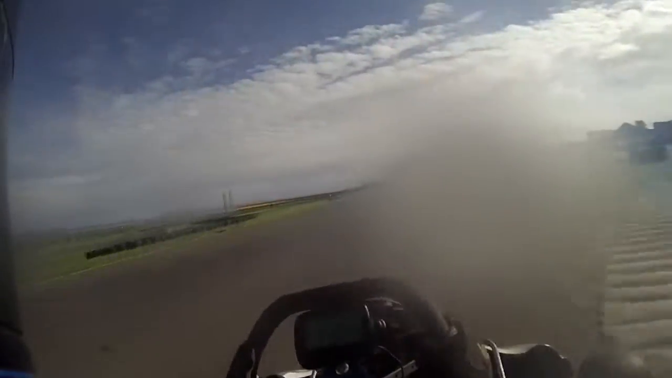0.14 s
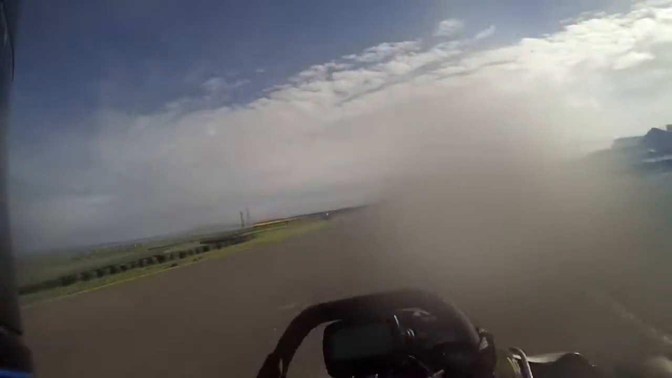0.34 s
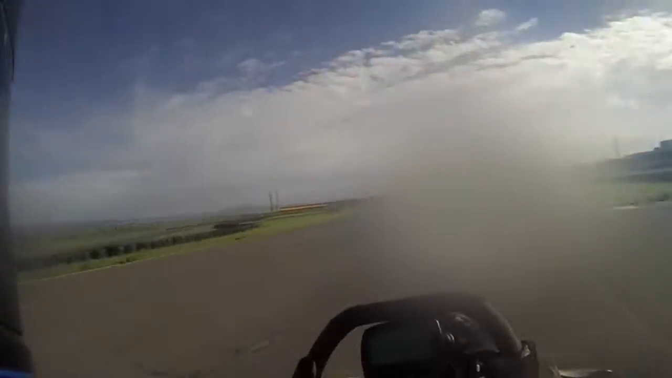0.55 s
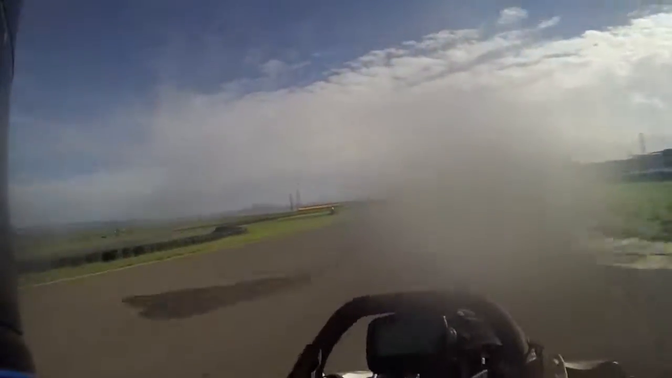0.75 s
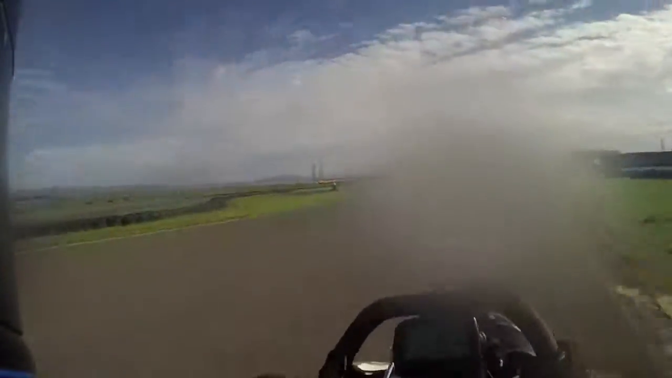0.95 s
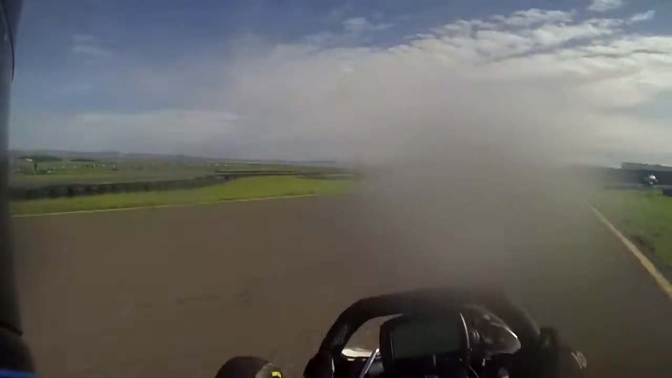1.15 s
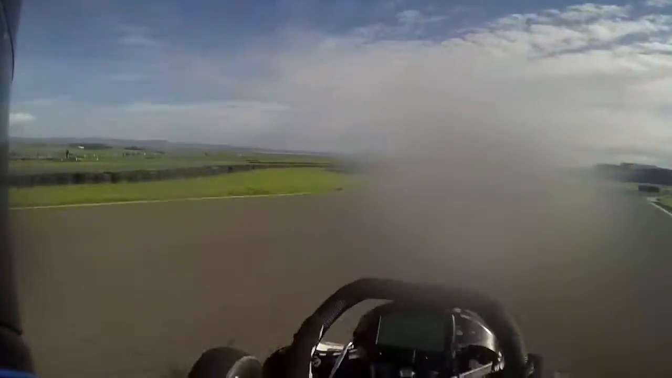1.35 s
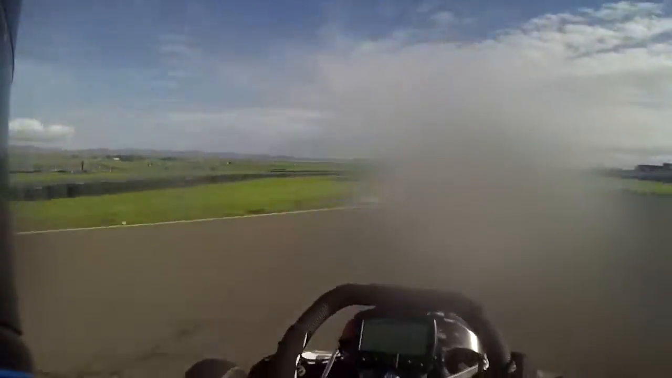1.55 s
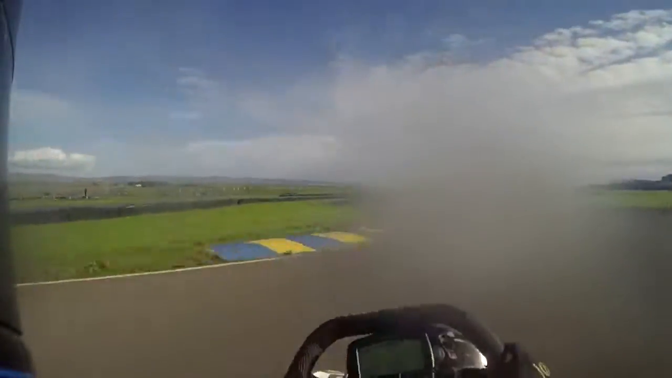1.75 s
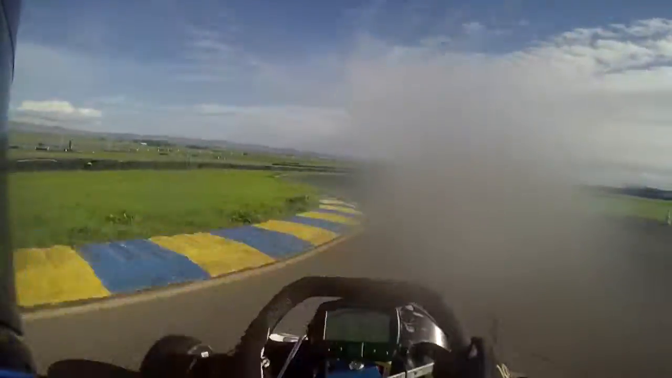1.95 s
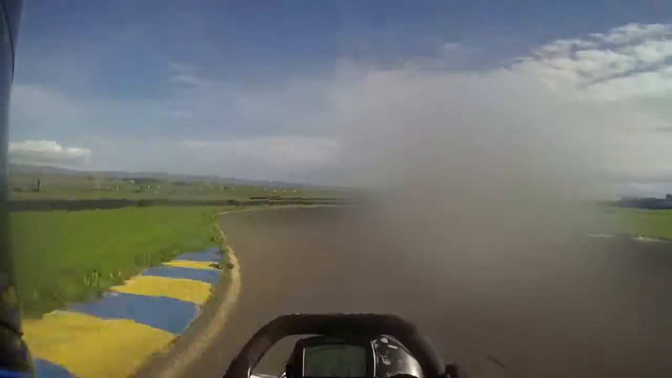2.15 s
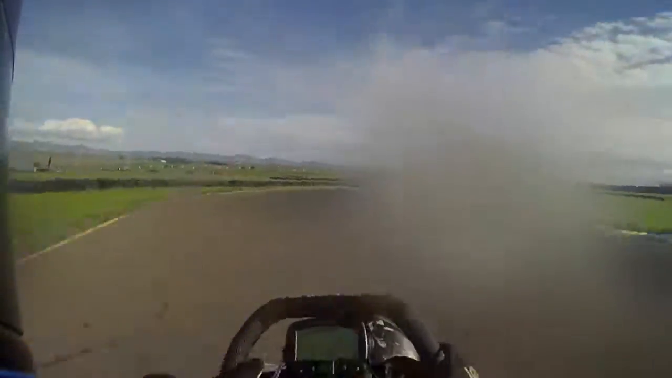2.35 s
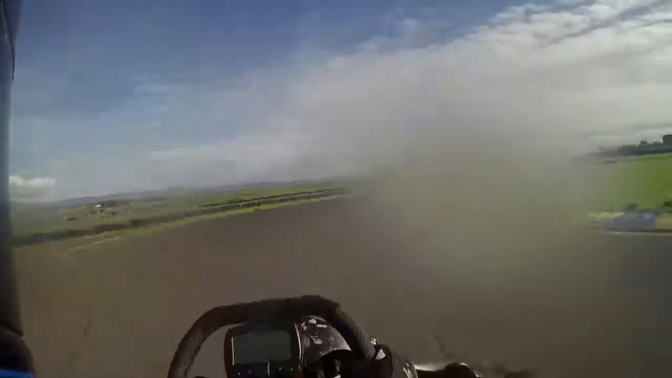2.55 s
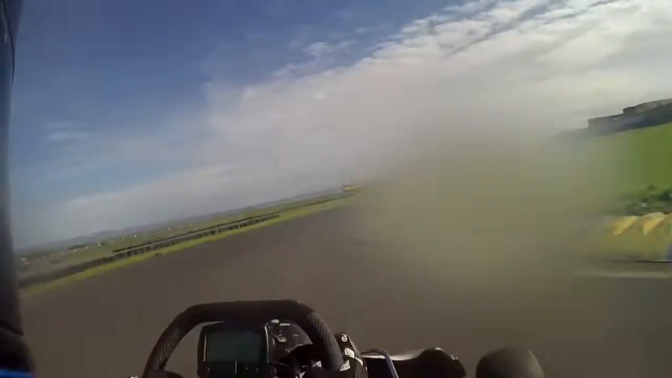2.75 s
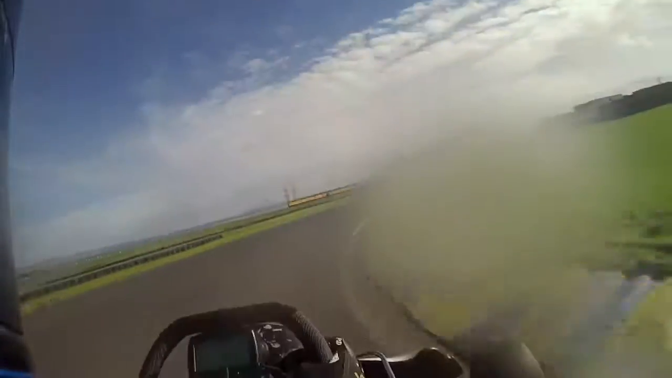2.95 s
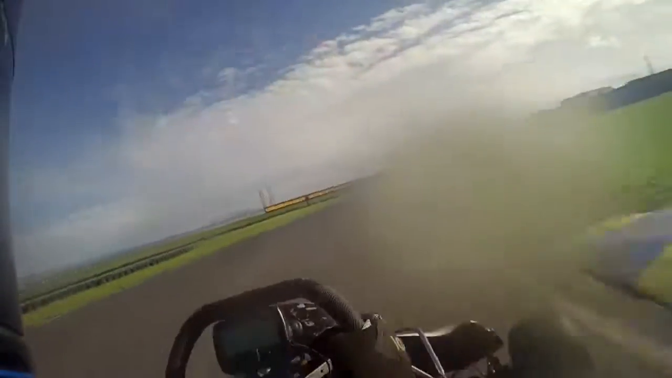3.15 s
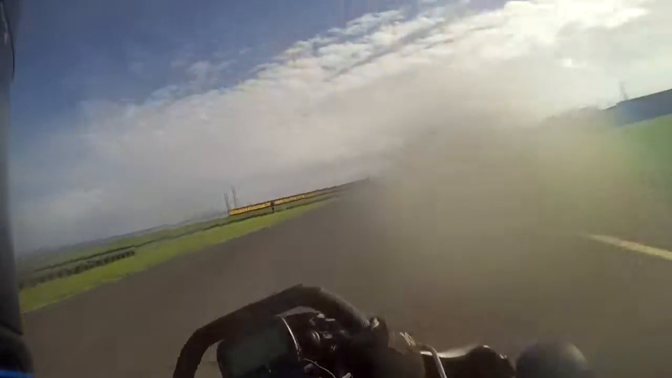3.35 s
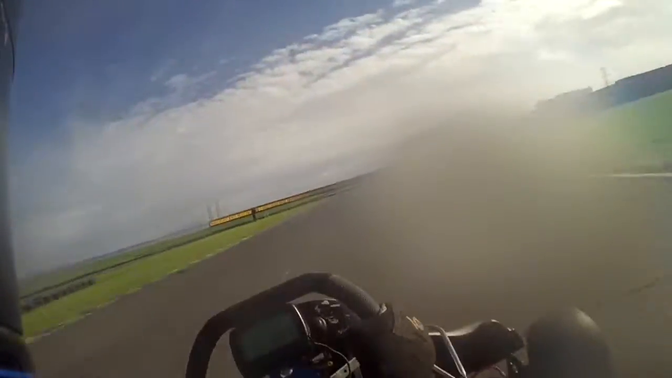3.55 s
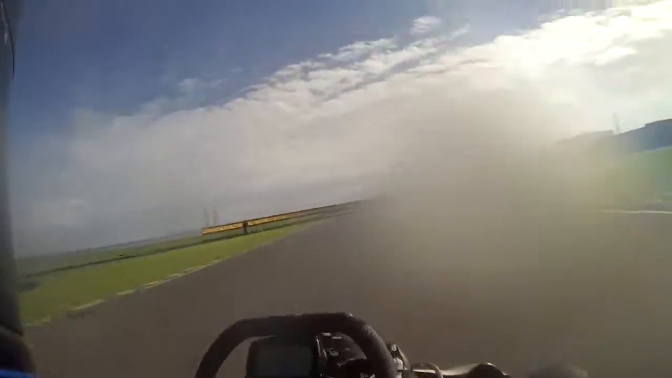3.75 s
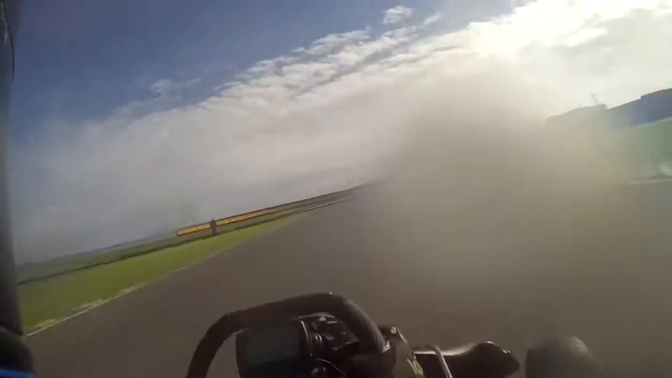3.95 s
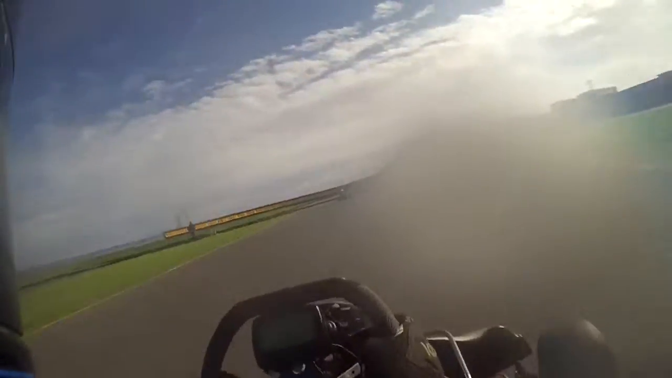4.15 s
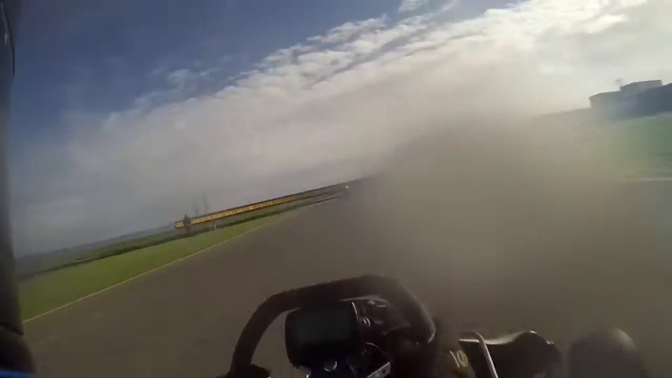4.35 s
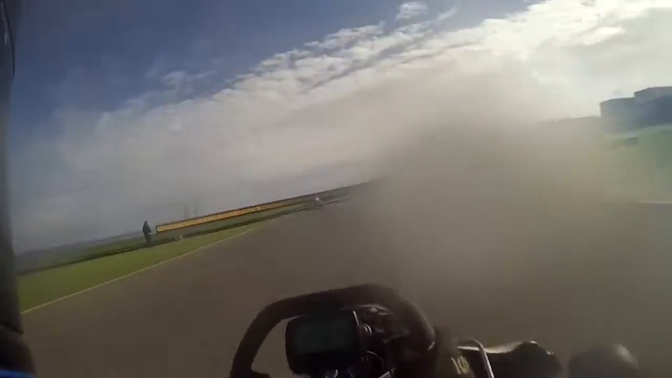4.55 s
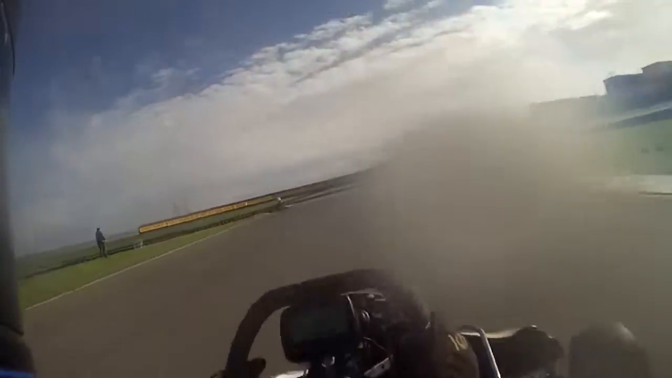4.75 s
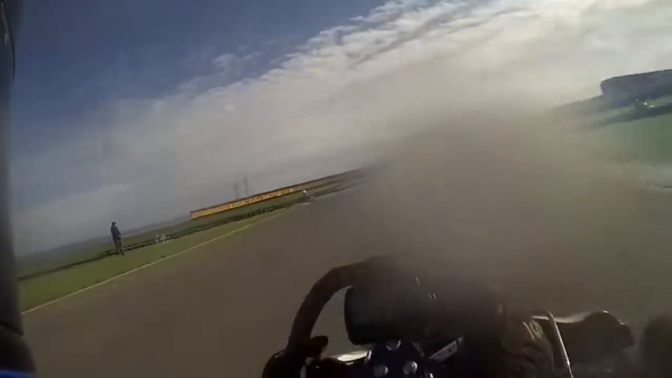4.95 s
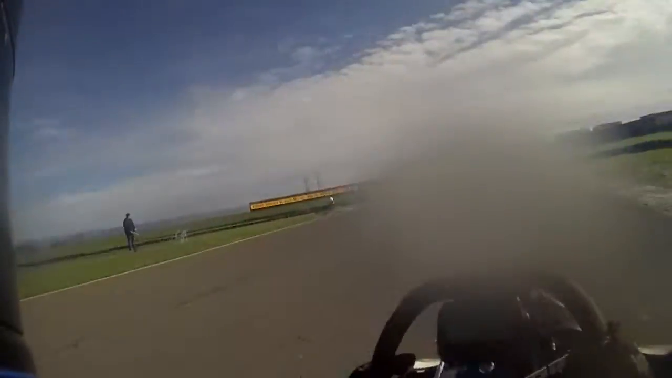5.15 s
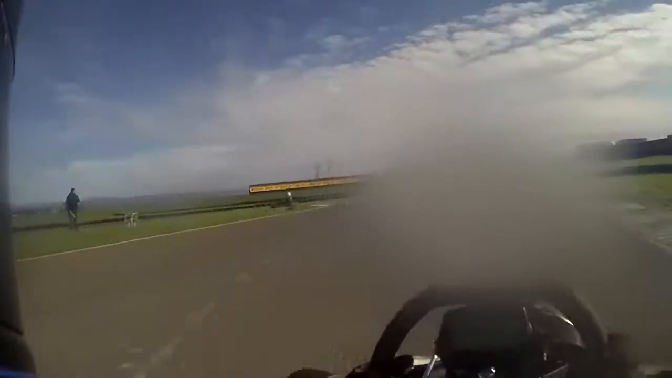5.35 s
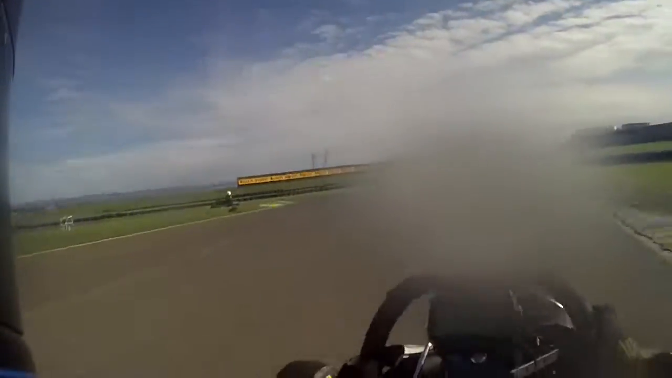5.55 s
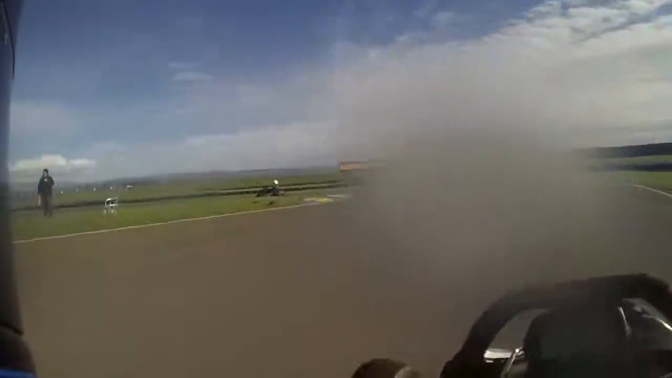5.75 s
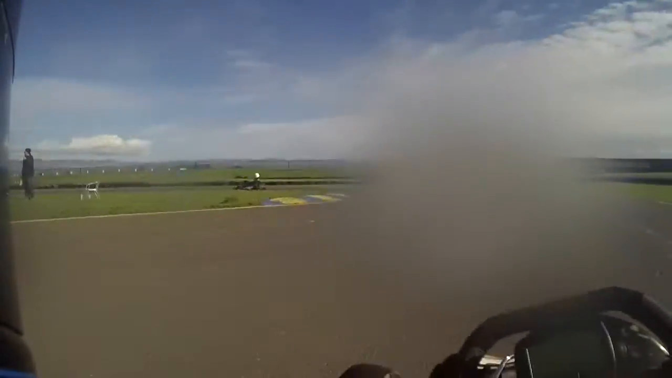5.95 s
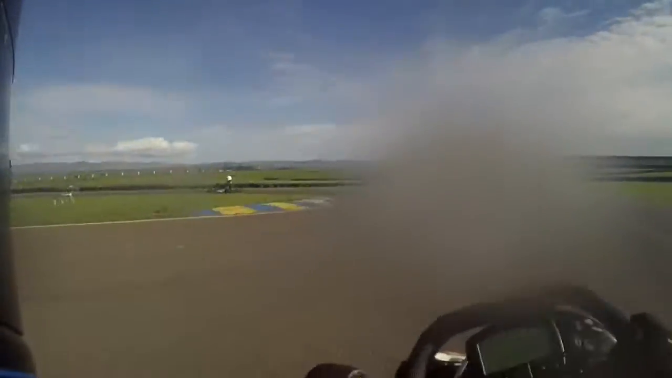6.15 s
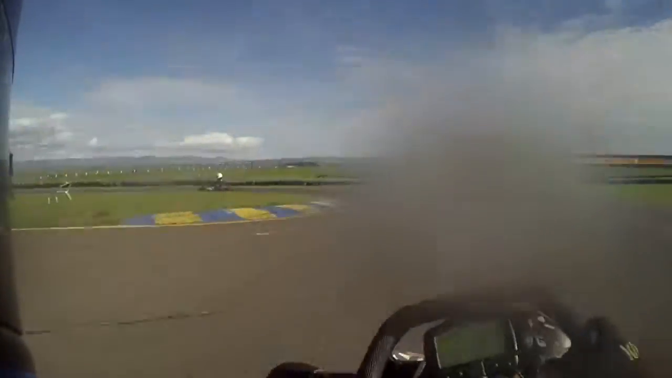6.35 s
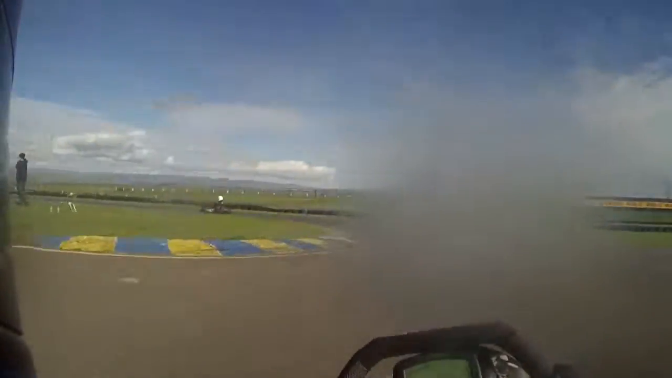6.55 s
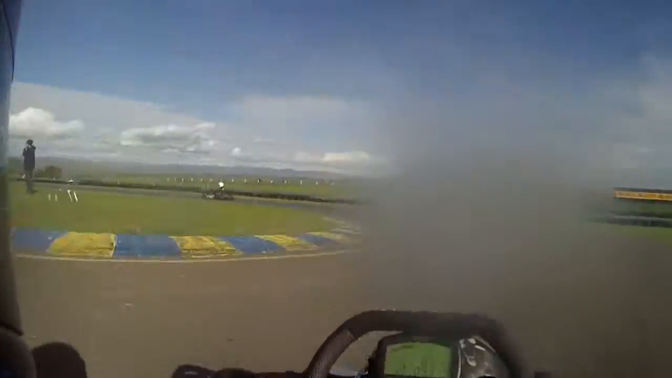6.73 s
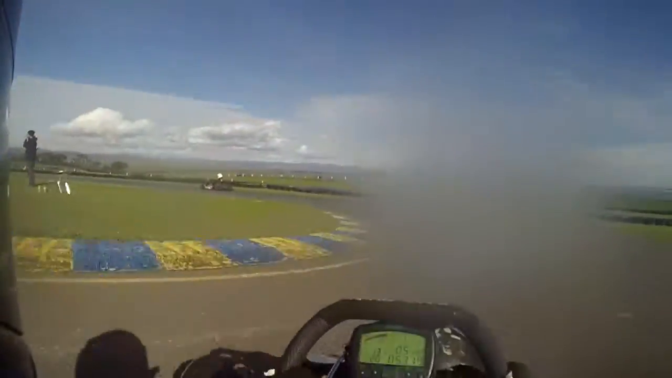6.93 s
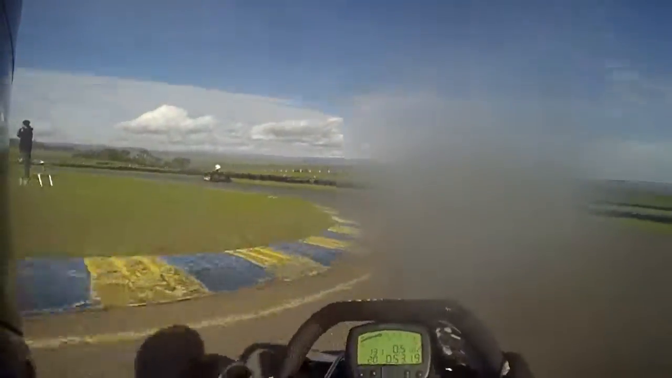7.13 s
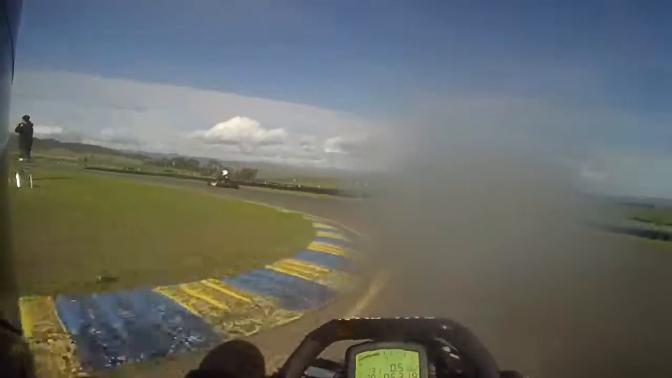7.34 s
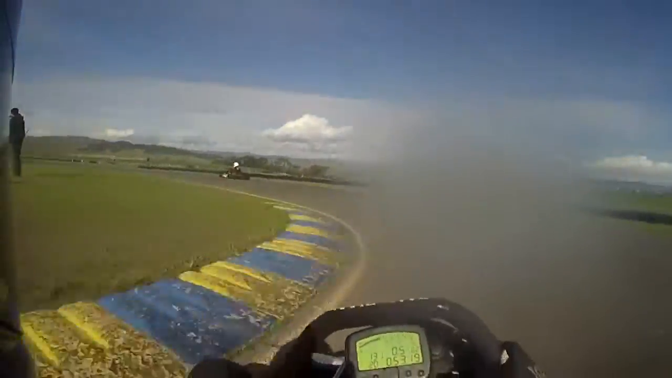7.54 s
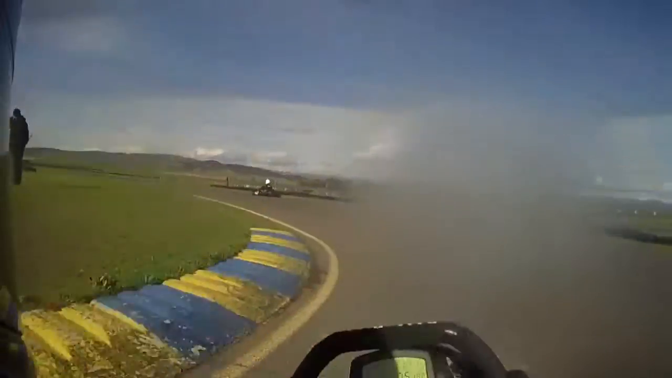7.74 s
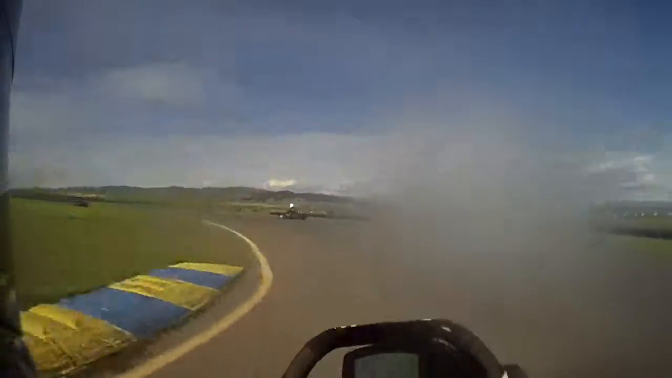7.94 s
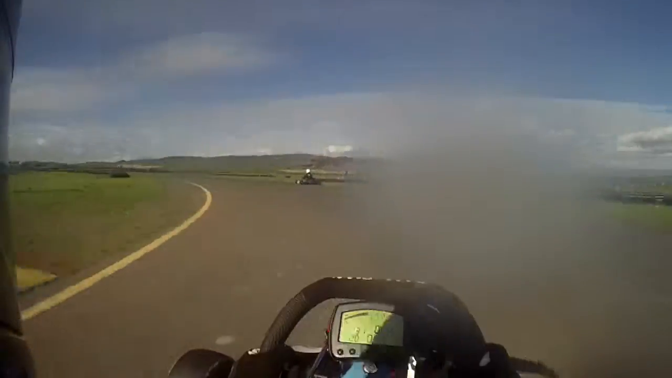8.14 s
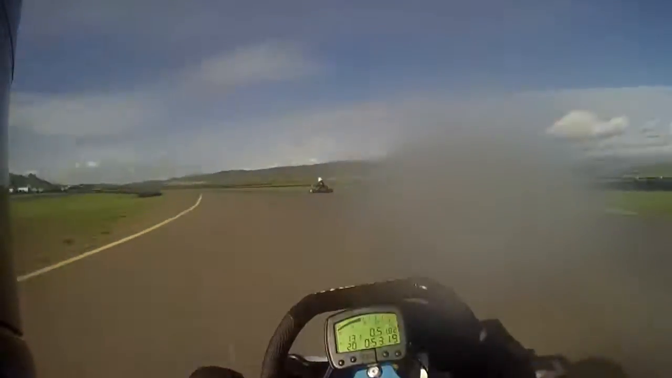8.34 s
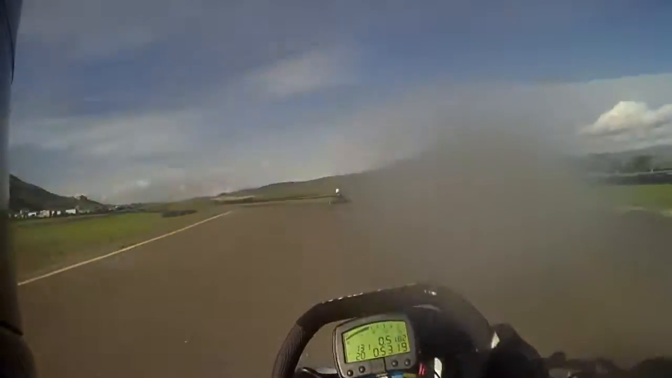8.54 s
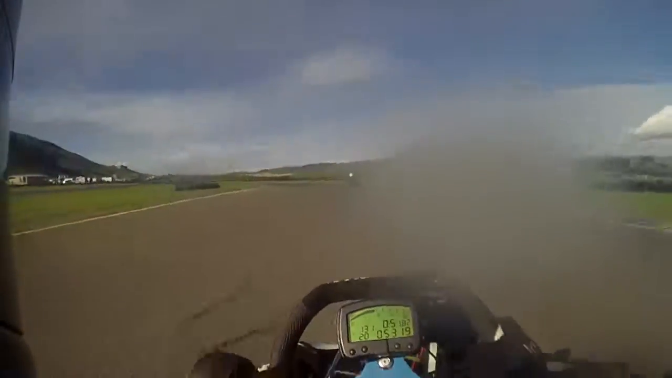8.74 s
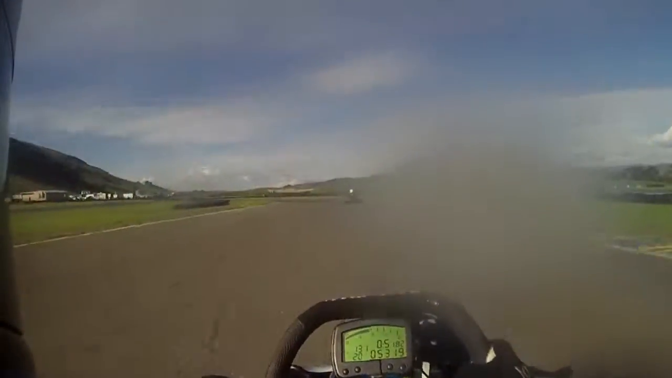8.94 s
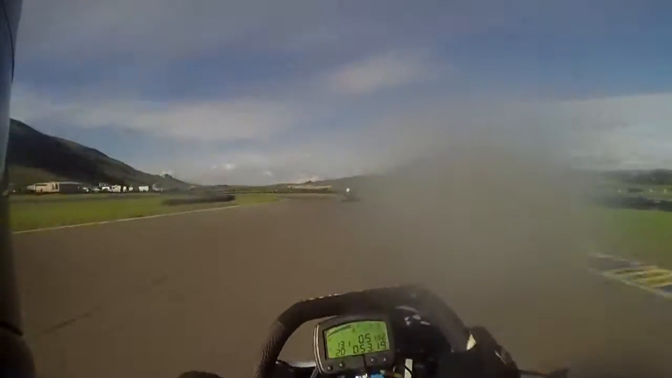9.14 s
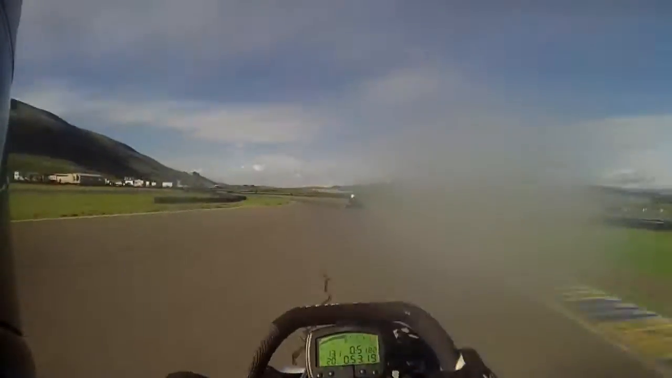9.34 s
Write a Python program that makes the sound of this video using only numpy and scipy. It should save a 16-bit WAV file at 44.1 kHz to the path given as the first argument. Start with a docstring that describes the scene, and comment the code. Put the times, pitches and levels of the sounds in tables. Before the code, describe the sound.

A small two-stroke racing kart buzzes up to full revs, brakes with a hiss, sputters through a slow corner and pulls away again amid wind buffeting.

```python
"""Kart track, from the driver's helmet: a two-stroke racing kart pulls up to full speed, holds it,
brakes into a hairpin, hops through it and drives out. Crank harmonics make the buzzing note and drone;
noise pulsed at the firing rate rings the metal as rasp. Coloured noise makes brake hiss, tyre scrub and wind;
narrow noise bands sing as disc and engine sizzle; push-pull pulses thump on the microphone."""
import sys
import numpy as np
from scipy import signal
from scipy.fft import rfft, irfft, next_fast_len
from scipy.io import wavfile
from scipy.ndimage import uniform_filter1d, map_coordinates

SR = 44100
rng = np.random.default_rng(int(sys.argv[2]) if len(sys.argv) > 2 else 0)


def to_wav(s):
    """Save 16-bit WAV."""
    ch = np.atleast_2d(s).T  # columns
    pcm = np.round(np.clip(ch, -1, 1) * 32767)  # PCM
    wavfile.write(sys.argv[1], SR, pcm.astype(np.int16))


N = 414099
TIME = np.arange(N) / SR
FREQS = np.maximum(np.fft.rfftfreq(N, 1 / SR), 1)


def from_db(db):
    """Decibels to gain."""
    return 10 ** (np.asarray(db) / 20)


def rms_one(x):
    """Scale to unit rms."""
    return x / np.sqrt(np.mean(x ** 2) + 1e-20)


def in_time(rows):
    """Each value column of a time curve, at every sample."""
    t_s, *columns = np.transpose(rows)
    return [np.interp(TIME, t_s, column) for column in columns]


def at_hz(points, hz):
    """Read a spectrum on a log-frequency axis."""
    f_hz, value = np.transpose(points)
    return np.interp(np.log(hz), np.log(f_hz), value)


def between(start_s, end_s, fade_s):
    """Gate: 1 from start to end, straight fades."""
    return np.clip(np.minimum(TIME - start_s, end_s - TIME) / fade_s + .5, 0, 1)


def drift(rate_hz):
    """Slow random curve of rms 1: noise through a double-pole low-pass, every 40 samples."""
    pole = np.exp(-80 * np.pi * rate_hz / SR)
    white = rng.standard_normal(N // 40 + 2002)
    settled = signal.lfilter([1], [1, -2 * pole, pole * pole], white)[2000:]
    return np.interp(np.arange(N) / 40, np.arange(len(settled)), rms_one(settled))


def coloured(x, gain_db):
    """Filter by a gain given at FREQS."""
    size = next_fast_len(N)
    gain = np.interp(np.fft.rfftfreq(size, 1 / SR), FREQS, from_db(gain_db))
    return irfft(rfft(x, size) * gain, size)[:N]


def noise(spectrum):
    """Turbulence or friction noise of a given colour, rms 1."""
    return rms_one(coloured(rng.standard_normal(N), at_hz(spectrum, FREQS)))


def above(x, hz):
    """Steep high-pass."""
    return coloured(x, -10 * np.log10(1 + (hz / FREQS) ** 24))


def around(x, hz, width_hz):
    """Keep a narrow band, about 3 dB down at its edges."""
    return coloured(x, -20 * np.log10(1 + (1.3 * (FREQS - hz) / width_hz) ** 2))


def singing(hz, width_hz, flutter_db=1.5, flutter_hz=10):
    """A resonance driven by noise sings unsteadily, rms about 1."""
    band = rms_one(around(rng.standard_normal(N), hz, width_hz))
    return band * from_db(flutter_db * drift(flutter_hz))


def harmonic(order, turns):
    """One order of the crank rotation, rms 1, random phase."""
    return np.sqrt(2) * np.sin(2 * np.pi * (order * turns + rng.random()))


# crank speed, one firing a turn, before hops and jitter: t/s, f/Hz
CRANK_SPEED = [(0.0, 168.9), (0.17, 171.8), (0.5, 184.2), (0.87, 194.7), (0.96, 194.4), (1.26, 202.4),
               (1.44, 201.7), (1.5, 205.1), (1.56, 200.4), (2.1, 200.4), (2.31, 202.1), (2.55, 201.3),
               (2.76, 203.4), (3.24, 204.2), (3.42, 206.2), (3.72, 202.7), (4.2, 205.1), (4.53, 185.9),
               (4.59, 176.6), (5.04, 148.3), (6.21, 107.3), (6.42, 107.0), (6.48, 108.5), (6.78, 110.6),
               (6.96, 109.7), (7.02, 108.3), (7.29, 112.8), (7.35, 111.3), (7.41, 114.5), (7.5, 113.3),
               (7.65, 116.2), (7.68, 119.4), (7.77, 115.9), (8.07, 123.9), (8.43, 123.9), (8.64, 125.4),
               (8.73, 129.5), (8.79, 128.0), (8.88, 132.2), (9.0, 134.3), (9.3, 147.2), (9.39, 148.1)]
# chassis hops that swing the revs: start/s, end/s, hop rate/Hz, swing/Hz
CHASSIS_HOPS = [(6.41, 7.43, 5.39, 1.3), (7.93, 8.8, 6.13, 1.6)]


def crank(jitter=.0012, jitter_hz=35, bumps=.002, bumps_hz=6):
    """Firing rate/Hz and angle/turns; hops and bumps load the axle, and no two firings push quite alike."""
    hops_hz = np.zeros(N)
    for start_s, end_s, rate_hz, swing_hz in CHASSIS_HOPS:
        hopping = (TIME > start_s) & (TIME < end_s)
        hops_hz += swing_hz * np.sin(2 * np.pi * rate_hz * (TIME - start_s)) * hopping
    unevenness = 1 + jitter * drift(jitter_hz) + bumps * drift(bumps_hz)
    firing_hz = (in_time(CRANK_SPEED)[0] + hops_hz) * unevenness
    return firing_hz, np.cumsum(firing_hz) / SR


SHUT_S, SNAP_S, REOPEN_S, FEED_S = 4.22, .07, 5.85, .5


def throttle_shut():
    """1 = shut, 0 = open: snapped shut over SNAP_S, fed back in over FEED_S."""
    closing = (TIME - SHUT_S) / SNAP_S
    reopening = 1 - (TIME - REOPEN_S) / FEED_S
    return np.clip(np.minimum(closing, reopening), 0, 1)


# fixed resonances of the note, before engine level: f/Hz, harmonic level/dB
NOTE_RESONANCES = [(740, -48), (835, -30), (905, -17.5), (1000, -21.5), (1080, -20), (1160, -26),
                   (1240, -28), (1320, -18), (1405, -14.5), (1470, -18.5), (1550, -27), (1660, -22),
                   (1800, -22), (2050, -15.5), (2200, -20.5), (2320, -19), (2410, -12.5), (2600, -21.5),
                   (2720, -14.5), (2950, -16), (3080, -6), (3220, -6.5), (3330, -14), (3450, -11.5),
                   (3620, -15.5), (3740, -14), (4100, -27), (4750, -20), (5100, -25), (5700, -20),
                   (6250, -18.5), (6600, -28), (7100, -24), (7550, -31), (7950, -24), (8400, -33),
                   (8900, -30), (10500, -42)]
# tuned pipe's lift or damping: harmonic number, change/dB
PIPE_TUNING = [(4, 15), (5, -6), (6, 9.5), (7, -2), (9, -4), (10, 3), (11, 7), (12, -8), (13, 8), (16, -3),
               (17, 3), (24, 4), (26, 6), (29, 4), (30, 4), (35, 6), (39, 3)]
PIPE_IN_S, PIPE_FADE_S = 2.59, 0.28  # middle and length of its fade-in
# harmonics flaring as they catch a resonance: start/s, end/s, harmonic number, lift/dB
HARMONIC_FLARES = [(-0.1, 0.3, 18, 2.5), (-0.1, 0.2, 16, 5), (0.38, 0.65, 17, 5), (0.56, 0.72, 20, 7),
                   (0.92, 1.08, 16, 4), (1.25, 4.4, 30, 9), (4.28, 4.56, 12, 10), (4.26, 4.45, 16, 5),
                   (7.97, 8.11, 26, 9), (8.3, 8.45, 26, 4), (8.96, 9.17, 23, 4), (9.1, 9.3, 10, 4),
                   (9.22, 9.5, 21, 3), (9.25, 9.5, 24, 5)]
FLARE_FADE_S = .06
FIRST_FULL_HARMONIC, THINNING_DB = 6, 4.5  # loss per harmonic below the first full one
WAVER_DB = 1.4
QUIVER_RAD, QUIVER_AT_HZ, QUIVER_HZ = 1.7, 6000, 14


def note(firing_hz, turns, overrun, waver_hz=6, rough=0.18, stumble_rad=1.24, stumble_hz=35, count=64):
    """Firing harmonics slide through fixed resonances; at peak revs the pipe picks out its own."""
    step = 64  # control curves are sparse
    coarse_s = TIME[::step]
    pipe_in = np.clip((TIME - PIPE_IN_S) / PIPE_FADE_S + .5, 0, 1)
    pipe_out = np.clip(1 - (TIME - SHUT_S) / SNAP_S, 0, 1)
    on_pipe = (pipe_in * pipe_out)[::step]
    pipe_db = {round(k): db for k, db in PIPE_TUNING}
    hz, overrun, out = firing_hz[::step], overrun[::step], np.zeros(N)

    def sway(rate_hz):
        """Smoothed noise, rms 1."""
        window = max(2, int(SR / step / rate_hz))
        return rms_one(uniform_filter1d(rng.standard_normal(len(hz)), window))

    for k in range(2, count + 1):
        level_db = at_hz(NOTE_RESONANCES, k * hz) + on_pipe * pipe_db.get(k, 0)
        level_db = level_db - THINNING_DB * max(FIRST_FULL_HARMONIC - k, 0)
        for start_s, end_s, which, lift_db in HARMONIC_FLARES:
            if which == k:
                level_db = level_db + lift_db * between(start_s, end_s, FLARE_FADE_S)[::step]
        gain = np.interp(TIME, coarse_s, from_db(level_db + WAVER_DB * sway(waver_hz)))
        # uneven burning on the overrun smears each line; high ones always quiver
        quiver_rad = QUIVER_RAD * np.minimum(k * hz / QUIVER_AT_HZ, 1) ** 4 * sway(QUIVER_HZ)
        slip_rad = stumble_rad * overrun * sway(stumble_hz) + quiver_rad
        slip_turns = np.interp(TIME, coarse_s, slip_rad) / (2 * np.pi * k)
        out += gain * harmonic(k, turns + slip_turns)
    return out * (1 + rough * drift(16.0))


# ringing of the engine's metal: f/Hz, width/Hz, lift/dB
METAL_RINGS = [(926, 44, 8.5), (1386, 81, 6.5), (2016, 40, 5.5), (2210, 610, 8.5), (3194, 430, 11),
               (3790, 190, 2.5), (4710, 130, 3), (6170, 390, 7.5), (7060, 620, 5), (7850, 330, 10),
               (11980, 500, 7), (14600, 940, 8.5)]


def restless(sound):
    """Rattling keeps changing its contacts: each ring of the metal swells and fades on its own."""
    swell_db, swell_hz = 1.5, 2.5
    changes = np.zeros(N)
    for hz, width_hz, _ in METAL_RINGS:
        swell = from_db(swell_db * drift(swell_hz) - swell_db / 4)
        changes += around(sound, hz, width_hz) * (swell - 1)
    return sound + changes


# stray firings, throttle shut: t/s, length/s, strength (1 = normal firing)
STRAY_FIRINGS = [(4.43, 0.034, 0.41), (4.565, 0.066, 0.66), (4.673, .03, .5), (4.78, 0.069, 1.25),
                 (4.923, 0.036, 1.15), (5.014, 0.055, 1.2), (5.135, .055, 1.1), (5.203, 0.023, 1),
                 (5.275, 0.061, 1), (5.33, 0.022, 1.2), (5.365, .015, 1.4), (5.41, .018, 1.4),
                 (5.467, 0.032, 1.3), (5.515, 0.058, 1.3), (5.58, 0.017, 1.7), (5.635, 0.057, 1.5),
                 (5.675, .02, 0.97), (5.745, 0.034, 1.3), (5.797, .02, 1), (5.845, 0.028, 0.79)]
MISFIRE_DB = -8.5  # crack between them


def sputters(turns):
    """Combustion crack strength, throttle shut: fuel catches only for a few cycles at a time."""
    catching = np.zeros(N)
    for t_s, length_s, strength in STRAY_FIRINGS:
        catching += strength * np.exp(-(2 * (TIME - t_s) / length_s) ** 4)
    cracks = rms_one(np.exp(-2 * (turns % 1)))
    return np.hypot(from_db(MISFIRE_DB), catching * cracks)


# mechanical rasp, before ringing and engine level: f/Hz, level/(dB per Hz)
RASP_COLOUR = [(150, -63), (400, -54.5), (640, -52.5), (780, -53), (880, -46.5), (1150, -46), (1750, -40.5),
               (2000, -43), (2600, -38.5), (2850, -37), (3720, -35), (3950, -41.5), (5700, -38),
               (7600, -49.5), (9200, -49.5), (10300, -60.5), (15000, -63.5)]
PULSING, SLOW_HZ = .24, 110  # pulsing depth (0-1) at SLOW_HZ; faster firings run together


def rasp(firing_hz, turns, bright_db, overrun, flicker_db=0.87, neutral_db=-5.0, treble_hz=4200,
         crack_hz=8400, sputter_db=1.0):
    """Noise pulsed by each firing rings the metal; its treble follows the brightness."""
    depth = PULSING * (SLOW_HZ / firing_hz) ** 2
    bursts = rng.standard_normal(N) * (1 + depth * np.cos(2 * np.pi * turns))
    ringing_db = sum(lift_db / (1 + (2 * (FREQS - hz) / width_hz) ** 2) for hz, width_hz, lift_db in METAL_RINGS)
    per_hz = rms_one(bursts) * np.sqrt(SR / 2)  # unit power per Hz
    sound = restless(coloured(per_hz, at_hz(RASP_COLOUR, FREQS) + ringing_db))
    catching = sputters(turns)
    sag_db = sputter_db * overrun * (np.minimum(catching, 1) - 1)
    treble_db = bright_db - neutral_db + sag_db + flicker_db * drift(10)
    sound = sound + above(sound, treble_hz) * (from_db(treble_db) - 1)
    # the very top is the combustion crack, which comes and goes on the overrun
    return sound + above(sound, crack_hz) * overrun * (catching - 1)


# silencer drone, before drone level: f/Hz, harmonic level/dB, share of engine swing followed (0-1)
SILENCER_DRONE = [(110, 10.5, .3), (130, 9.5, .3), (160, -3, .9), (220, -4, .9), (330, -5, .9),
                  (370, -5, .9), (408, 2.5, .9), (440, 3, .9), (465, -2, .9), (505, 10.5, .9), (540, 0, .8),
                  (578, -1.5, .1), (610, -8, .1), (660, -10, .1), (770, -7.5, .1), (900, -12, .1)]


def drone(firing_hz, turns, swing_db, waver_db=3.5, waver_hz=3, count=7):
    """The lowest orders leave through the silencer as clean tones."""
    columns = np.array(SILENCER_DRONE)
    colour, follows = columns[:, :2], columns[:, ::2]
    out = np.zeros(N)
    for k in range(1, count + 1):
        level_db = at_hz(colour, k * firing_hz) + at_hz(follows, k * firing_hz) * swing_db
        out += from_db(level_db + waver_db * drift(waver_hz)) * harmonic(k, turns)
    return out


# engine effort, before balance: t/s, loudness/dB, treble rasp level/dB
ENGINE_EFFORT = [(0.0, -34.5, -31), (0.45, -29.5, -30.5), (1.0, -29, -32.5), (1.15, -30, -36),
                 (2.35, -30, -34), (2.9, -29, -29), (4.2, -29, -29.5), (4.65, -36.5, -36),
                 (5.0, -39, -39.5), (5.4, -44.5, -44.5), (6.38, -46, -47), (6.49, -44, -43.5),
                 (6.75, -45, -44.5), (7.08, -45.5, -43), (7.22, -43, -42), (7.7, -43, -42.5),
                 (8.1, -42, -38), (8.8, -38, -37), (9.15, -36, -36), (9.39, -36, -35)]
# pull: t/s, cleanness (0 = ragged or shut, 1 = firing every turn)
CLEAN_PULL = [(0, 0.9), (.55, 0.68), (1.2, 0.6), (4.22, 0.52), (4.29, 0.18), (5.85, 0.2), (6.35, 0.6),
              (7.75, 0.58), (8.15, 0.8), (8.47, 0.9), (8.55, 0.55), (8.63, 0.95), (9.39, 0.95)]
NOTE_DB, PULL_NOTE_DB, PULL_RASP_DB = -5.2, 8.0, -4.5  # ragged note; changes from ragged to clean
DRONE_DB, USUAL_DB = -66.5, -36.5  # drone trim; engine loudness it applies at
DRONE_SHUT_DB, DRONE_BREAK_DB, DRONE_BREAK_HZ = -6, 4, 12  # throttle shut: drone sinks and breaks up


def engine(rasp_db=-0.5):
    """A clean pull makes the note stand out; a shut throttle leaves mostly rasp."""
    level_db, treble_db = in_time(ENGINE_EFFORT)
    pull, overrun = np.clip(in_time(CLEAN_PULL)[0], 0, 1), throttle_shut()
    firing_hz, turns = crank()
    buzz = from_db(NOTE_DB + PULL_NOTE_DB * pull) * note(firing_hz, turns, overrun)
    raw_rasp = rasp(firing_hz, turns, treble_db - level_db, overrun)
    clatter = from_db(rasp_db + PULL_RASP_DB * pull) * raw_rasp
    drone_db = DRONE_DB + overrun * (DRONE_SHUT_DB + DRONE_BREAK_DB * drift(DRONE_BREAK_HZ))
    hum = from_db(drone_db) * drone(firing_hz, turns, level_db - USUAL_DB)
    return from_db(level_db) * (buzz + clatter) + hum


# engine sizzle under load: t/s, level/dB
SIZZLE_LEVEL = [(0, -39.5), (1.02, -40.5), (1.2, -52), (2.55, -43.5), (2.8, -38), (4.25, -38), (4.5, -48),
                (6.3, -58), (7.8, -64), (8.2, -54), (9.39, -48)]
SIZZLE_HZ, SIZZLE_WIDTH_HZ = 7190, 210


def sizzle():
    """A narrow high band sings out when the engine works hard."""
    return from_db(in_time(SIZZLE_LEVEL)[0]) * singing(SIZZLE_HZ, SIZZLE_WIDTH_HZ)


# wind, before trims and gusts: t/s, buffeting level/dB, rush level/dB
WIND_LEVELS = [(0.0, -42.5, -39), (0.6, -35.5, -45), (1.29, -31.5, -43), (1.42, -41, -45),
               (2.03, -37.5, -43), (2.33, -32.5, -35), (2.55, -23, -37), (2.82, -30, -40.5),
               (3.0, -28, -38.5), (3.7, -27.5, -35.5), (3.85, -36.5, -36.5), (4.65, -36.5, -38),
               (5.19, -45.5, -51), (5.28, -48, -54.5), (6.5, -52.5, -60), (7.4, -54.5, -63.5),
               (8.0, -40, -55), (9.2, -30, -48), (9.39, -31, -52)]
# buffeting colour: f/Hz, relative level/(dB per Hz)
BUFFET_COLOUR = [(5, 0), (22, -0.5), (55, -4), (90, -6), (150, -15), (300, -29.5), (700, -74)]
# rush colour: f/Hz, relative level/(dB per Hz)
RUSH_COLOUR = [(50, -6), (120, 1), (190, -1), (330, -6.5), (480, -12.5), (700, -21), (1500, -23),
               (4000, -71)]
# single gusts and lulls: t/s, half length/s, lift/dB
SINGLE_GUSTS = [(0.248, 0.089, 4.5), (0.398, 0.09, -2), (0.537, 0.046, 4), (3.977, 0.065, 3.5),
                (7.61, 0.054, 7), (7.855, 0.036, 2), (8.77, 0.055, 2)]


def wind(buffet_db=-2.5, rush_db=-1.84, gust_db=1.23, gust_hz=9, flutter_db=2.0, flutter_hz=30):
    """Deep buffeting and a higher rush share the same eddies; small eddies make the rush flutter."""
    gusts_db = sum(lift_db * np.exp(-np.square((TIME - t_s) / half_s)) for t_s, half_s, lift_db in SINGLE_GUSTS)
    low_db, high_db = in_time(WIND_LEVELS) + gusts_db
    rush = from_db(high_db + rush_db + flutter_db * drift(flutter_hz)) * noise(RUSH_COLOUR)
    buffeting = from_db(low_db + buffet_db) * noise(BUFFET_COLOUR)
    return (buffeting + rush) * from_db(gust_db * drift(gust_hz))


# scrub colour: f/Hz, relative level/(dB per Hz)
SCRUB_COLOUR = [(300, -7), (780, -12), (900, 6), (1200, -2), (2500, -16)]
SCRUB_AT_S, SCRUB_HALF_S, SCRUB_PEAK_DB = 4.5, 3.9, -56.5


def tyres(grip_db=-1.0, grip_hz=8):
    """Sliding rubber gives a dull scrub that swells towards the corner and fades, with uneven grip."""
    swell = np.exp(-np.square((TIME - SCRUB_AT_S) / SCRUB_HALF_S))
    return swell * from_db(SCRUB_PEAK_DB + grip_db * drift(grip_hz)) * noise(SCRUB_COLOUR)


# lone eddies on the microphone: t/s, half length/s, peak level/dB
LONE_EDDIES = [(0.523, 0.0089, -30), (0.865, 0.0083, -29), (1.287, 0.0066, -28), (2.597, 0.0057, -22),
               (2.722, 0.0045, -22), (2.982, .006, -23), (4.766, 0.0089, -35), (5.032, 0.012, -36),
               (5.086, 0.0066, -38), (5.155, .007, -37), (6.122, 0.0051, -37.5), (6.515, .01, -45),
               (6.73, 0.01, -44), (6.849, .009, -46), (7.103, 0.0036, -46), (7.506, .006, -49),
               (7.854, 0.0041, -37), (8.78, 0.0053, -34), (9.197, 0.0051, -29)]


def thumps():
    """Each eddy sucks, then pushes, once."""
    out = np.zeros(N)
    for t_s, half_s, peak_db in LONE_EDDIES:
        u = np.clip((TIME - t_s) / half_s, -10, 10)
        out += from_db(peak_db) * u * np.exp((1 - u * u) / 2)
    return out


# disc rubbing colour: f/Hz, relative level/(dB per Hz)
DISC_RUBBING = [(800, -17.5), (2500, -13), (4300, -7.5), (6500, -6), (7100, 9.5), (7700, -10),
                (8600, -13.5), (11000, -27), (15000, -62)]
BRAKE_ON_S, BRAKE_OFF_S, BRAKE_DB = 4.35, 5.05, -38
BRAKE_BITE_DB_PER_S, BRAKE_EASE_DB_PER_S = 300, 39
BRAKE_RISE, BRAKE_RISE_S = 0.036, 0.22  # share of pitch; time taken


def brake(grab_db=2.5, grab_hz=12):
    """Pads bite, rub the disc unevenly and ease off; the freed disc rings a little higher."""
    eased_s = np.maximum(TIME - BRAKE_OFF_S, 0)
    below_db = BRAKE_BITE_DB_PER_S * np.maximum(BRAKE_ON_S - TIME, 0) + BRAKE_EASE_DB_PER_S * eased_s
    read_speed = 1 + BRAKE_RISE * np.minimum(eased_s / BRAKE_RISE_S, 1)
    rubbing = map_coordinates(noise(DISC_RUBBING), [np.cumsum(read_speed)], order=3, mode="wrap")
    return from_db(BRAKE_DB - below_db + grab_db * drift(grab_hz)) * rubbing


# narrow rings that come and go: start/s, end/s, f/Hz, level/dB; the first row is the engine's metal ringing on
# the overrun, the rest are disc modes rung by grazing pads
DISC_GRAZES = [(4.4, 5.5, 915, -59), (4.95, 5.5, 1977, -56), (5.5, 6.7, 1950, -62.5),
               (6.43, 6.64, 3700, -52.5), (6.94, 7.31, 3680, -51), (6.47, 6.75, 8980, -60),
               (7.99, 8.04, 8860, -57), (8.18, 8.24, 8940, -53)]
GRAZE_WIDTH_HZ, GRAZE_FADE_S = 24, 0.037


def grazes():
    """The flexing chassis lets the disc touch the pads, and its modes sing; on the overrun a ring of the
    engine's metal sings too."""
    out = np.zeros(N)
    for start_s, end_s, hz, level_db in DISC_GRAZES:
        touch = between(start_s, end_s, GRAZE_FADE_S)
        out += from_db(level_db) * touch * singing(hz, GRAZE_WIDTH_HZ)
    return out


def scene():
    """Everything reaches one small microphone, alike in both channels."""
    mix = engine() + sizzle() + wind() + tyres() + thumps() + brake() + grazes()
    return np.tile(mix, (2, 1))


CUTOFF_HZ = 15400


def record(dry):
    """Steep elliptic low-pass: 0.1 dB ripple, 80 dB stop band."""
    return signal.sosfilt(signal.ellip(12, .1, 80, CUTOFF_HZ, fs=SR, output="sos"), dry)


dry = scene()
out = record(dry)
to_wav(out)
```